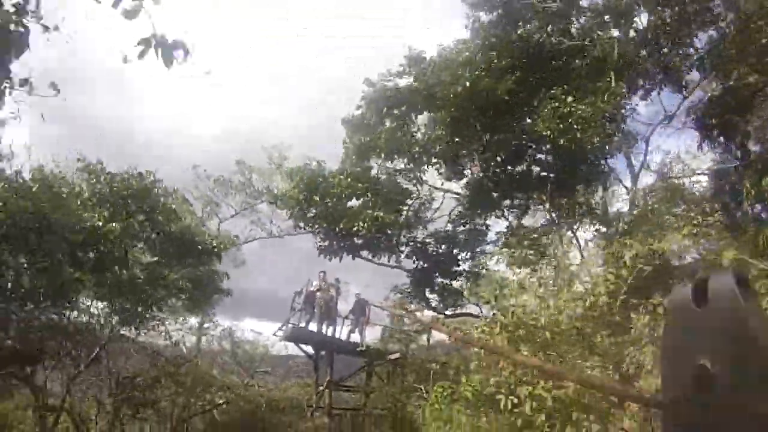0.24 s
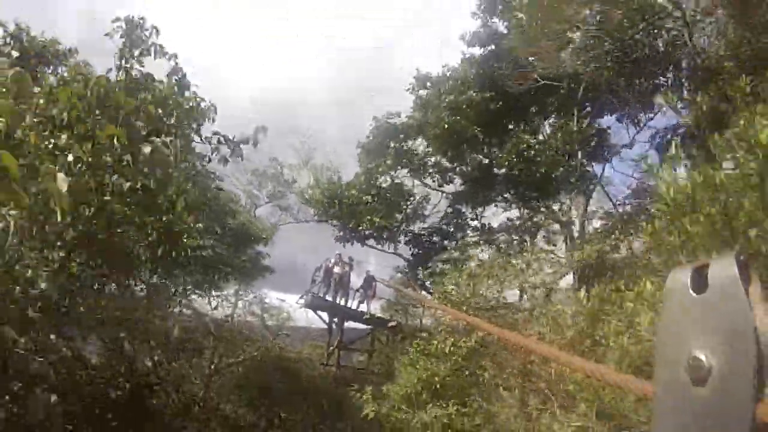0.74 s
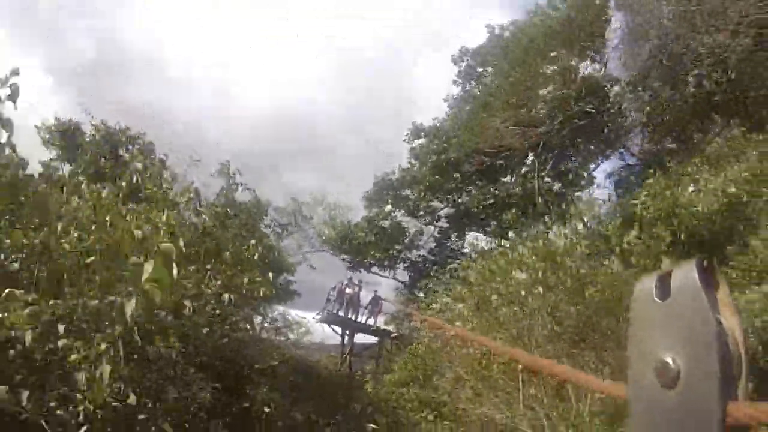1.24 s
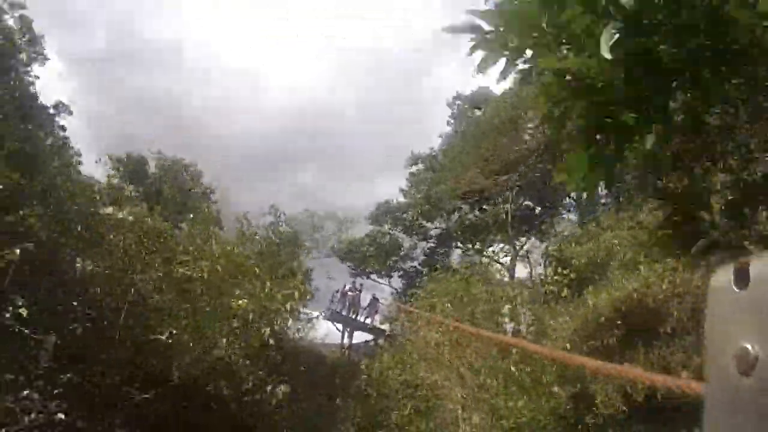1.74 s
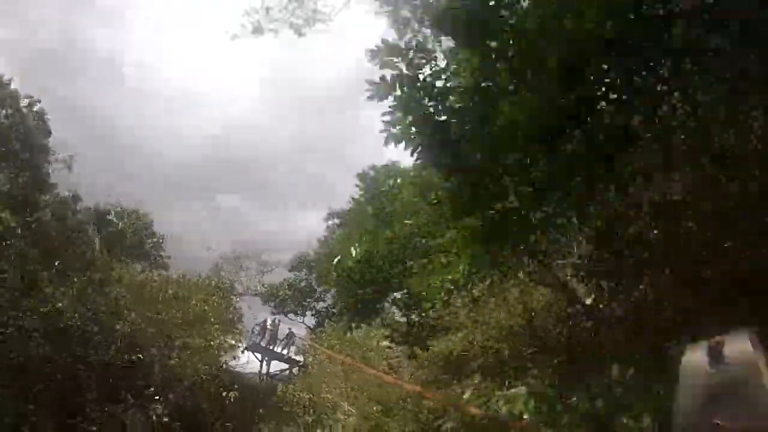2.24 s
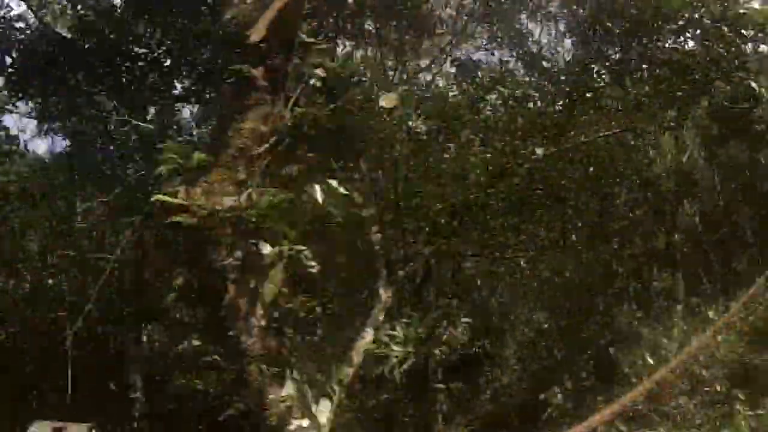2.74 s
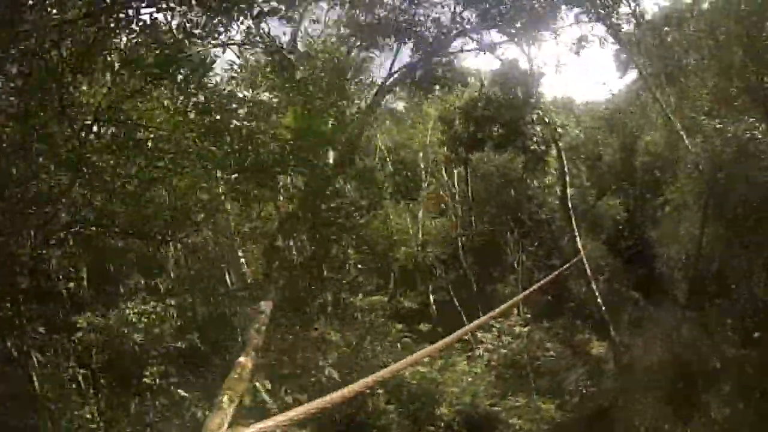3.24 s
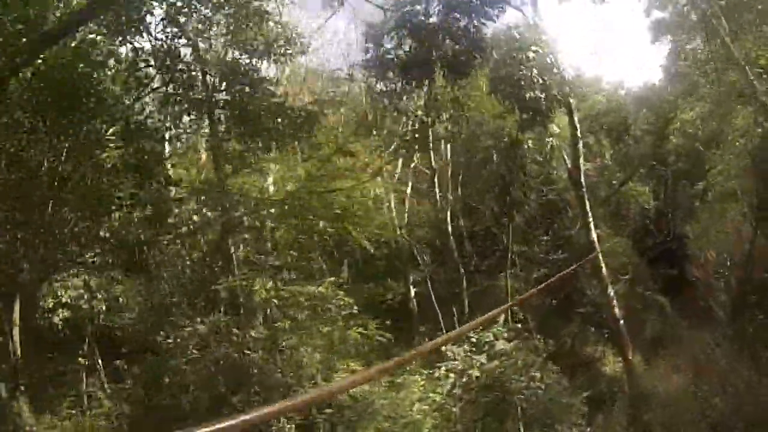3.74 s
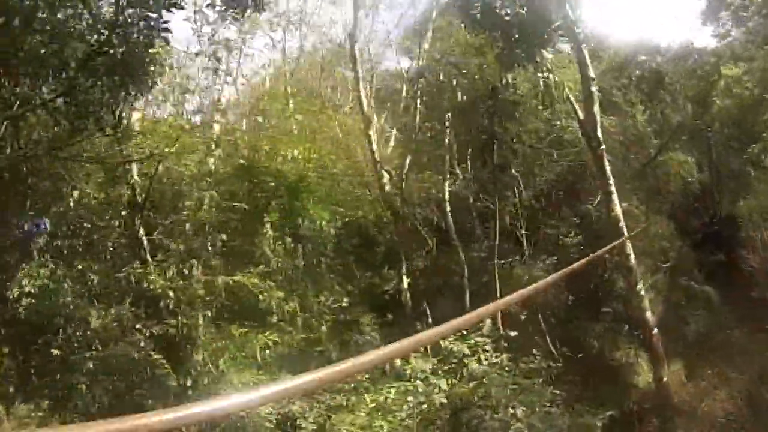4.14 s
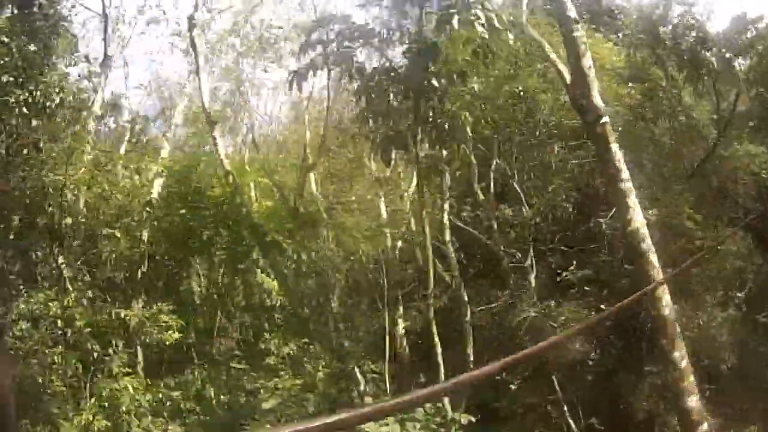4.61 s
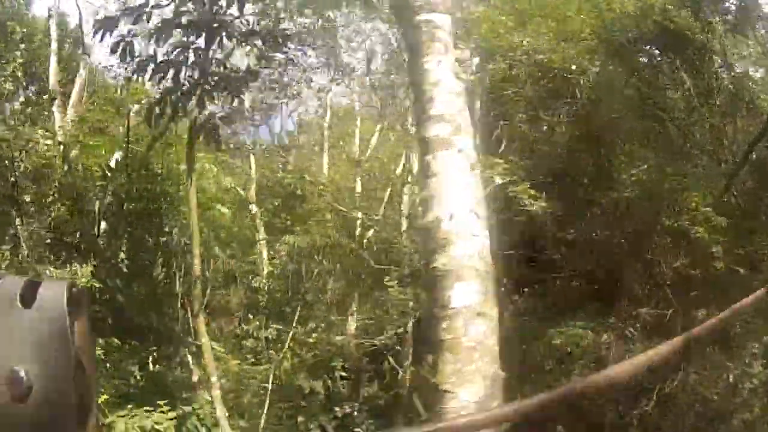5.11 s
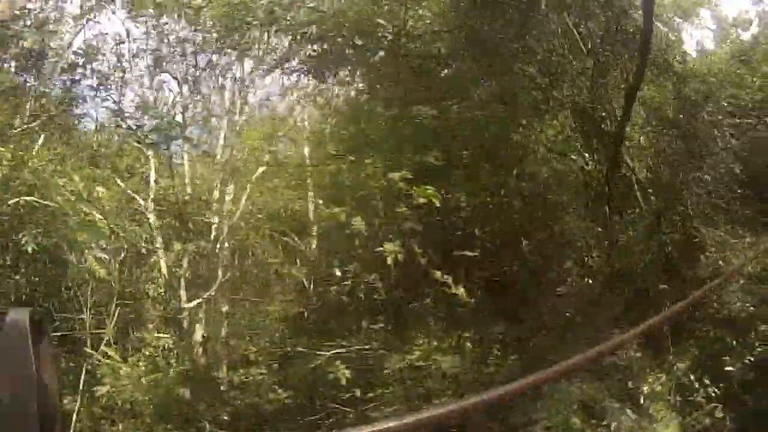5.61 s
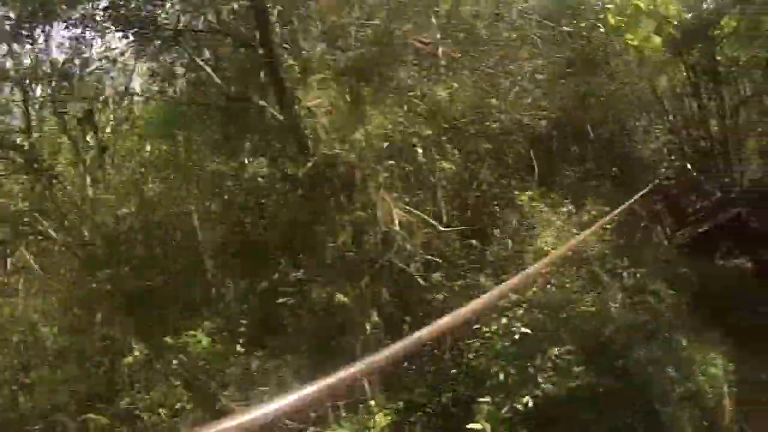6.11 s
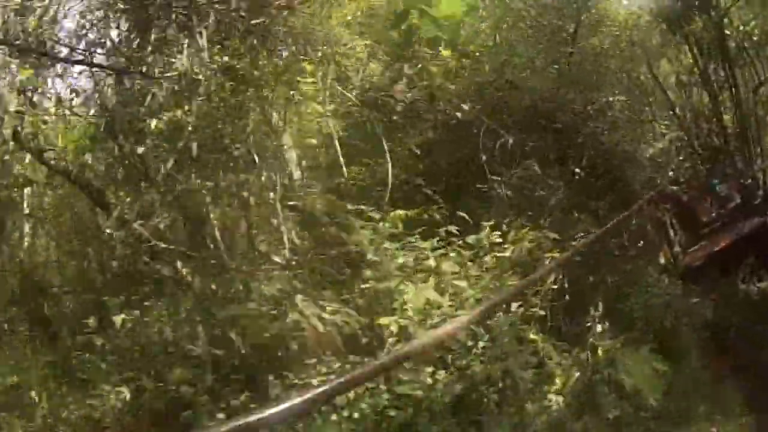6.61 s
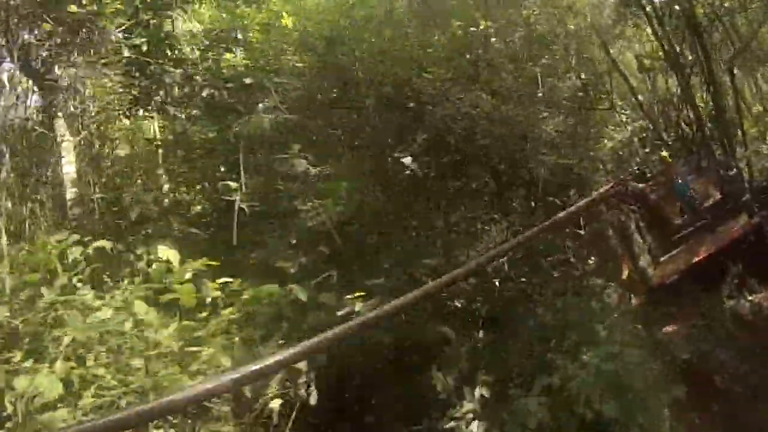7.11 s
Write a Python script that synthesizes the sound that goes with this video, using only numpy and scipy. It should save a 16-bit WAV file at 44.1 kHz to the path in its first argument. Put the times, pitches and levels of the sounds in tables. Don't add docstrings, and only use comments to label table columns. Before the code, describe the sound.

Fast zip line ride heard from a camera housing: harsh buzzing wheel whine, rattling plates, thudding jolts and wind, easing and dropping in pitch at the end.

```python
import sys
import numpy as np
from scipy import signal
from scipy.fft import rfft, irfft
from scipy.io import wavfile
from scipy.ndimage import uniform_filter1d

SR = 44100
rng = np.random.default_rng(int(sys.argv[2]) if len(sys.argv) > 2 else 0)


def gain_from_db(level_db):
    decades = np.asarray(level_db, float) / 20
    return 10 ** decades


def master(y):
    cut = np.clip(np.atleast_2d(y).T, -1, 1)
    pcm = np.round(cut * 32767)
    wavfile.write(sys.argv[1], SR, pcm.astype(np.int16))


N = 324576

# t/s, peak level/dB
WASHER_TAPS = [(5.9495, -49), (6.01, -37), (6.0394, -33), (6.1696, -43), (6.184, -28), (6.2443, -28),
               (6.2749, -35), (6.3966, -32), (6.4285, -24), (6.46, -20), (6.478, -41), (6.493, -21),
               (6.5114, -33), (6.524, -33), (6.5712, -52), (6.7126, -34), (6.7508, -37), (6.8276, -44),
               (6.861, -39), (6.886, -30), (6.9453, -39), (7.0534, -35), (7.2372, -44), (7.326, -45)]


def evened(x):
    return x / np.sqrt(np.mean(x ** 2) + 1e-20)


def columns(rows):
    s, *values = np.transpose(rows)
    return [np.interp(np.arange(N) / SR, s, v) for v in values]


def coloured(points):
    f_hz, level_db = np.transpose(points)
    hz = np.fft.rfftfreq(N, 1 / SR)
    gain_db = np.interp(np.log(hz + 1), np.log(f_hz + 1), level_db, left=-90, right=-90)
    return evened(irfft(rfft(rng.standard_normal(N)) * gain_from_db(gain_db), N))


def wander(top_hz):
    return evened(signal.lfilter(*signal.butter(2, top_hz, fs=SR), rng.standard_normal(N)))


def swells(rows, width_s):
    t = np.arange(N) / SR
    return sum(gain_from_db(db) * np.exp(-.5 * ((t - s) / width_s) ** 2) for s, db in rows)


def spell(middle_s, length_s):
    return np.exp(-(2 * (np.arange(N) / SR - middle_s) / length_s) ** 2)


def passed(x, edge_hz, kind):
    return signal.sosfilt(signal.butter(2, edge_hz, kind, fs=SR, output="sos"), x)


def passed_in_phase(x, order, edge_hz, kind="low"):
    return signal.sosfiltfilt(signal.butter(order, edge_hz, kind, fs=SR, output="sos"), x)


def wind():
    # t/s, level/dB
    wind_curve = [(0, -59.5), (.9, -59.5), (1.44, -54), (2.1, -54), (3.0, -57.5), (4.7, -61), (5.2, -58),
                  (6.1, -59.5), (7.36, -60.5)]
    # f/Hz, level/dB per Hz
    wash_spectrum = [(47, -15), (80, 4), (107, -4.5), (129, -7), (237, -10.5), (356, -14), (436, -22),
                     (600, -38), (780, -28), (1320, -120)]
    # f/Hz, level/dB per Hz
    hum_spectrum = [(310, -27), (345, -4.5), (370, -1), (392, -6.5), (430, -49)]
    # t/s, peak level/dB
    boom_events = [(.7, -59), (1.15, -58), (1.6, -69), (2.06, -56), (2.6, -52), (3.04, -62), (3.56, -57),
                   (4.05, -65), (5.27, -54.5), (5.7, -51), (7.04, -59)]
    gust_db, hum_db, boom_s = -0.1, -71, 0.11
    wash = gain_from_db(columns(wind_curve)[0] + gust_db * wander(2.9) + 3.5) * coloured(wash_spectrum)
    hum_level = gain_from_db(hum_db) + 0.39 * swells(boom_events, boom_s)
    return wash + hum_level * coloured(hum_spectrum)


def rumble():
    # f/Hz, level/dB per Hz
    ride_spectrum = [(7.1, -34), (12, -5), (27, 0.5), (43, 0), (52, -3), (61, -6.5), (68, -10.5), (76, -34),
                     (110, -23), (140, -36), (240, -120)]
    # f/Hz, level/dB per Hz
    end_spectrum = [(7.1, -36), (12, -8.5), (38, -1.5), (58, -2), (72, -14), (79, -31), (81, -34),
                    (86, -39), (110, -41), (140, -71), (240, -120)]
    # t/s, level/dB
    sway_curve = [(0, -41.5), (1.1, -39.5), (2.2, -41.5), (3.0, -32.5), (4.1, -38), (5.0, -35.5),
                  (6.0, -35.5), (7.36, -36.5)]
    # t/s, peak level/dB
    jolt_events = [(.1, -24.5), (.32, -27), (.42, -30), (.65, -19), (.8, -34), (.98, -30), (1.64, -26),
                   (1.86, -37), (2.03, -41), (2.36, -25), (2.62, -14.5), (2.83, -34), (3.0, -22),
                   (3.27, -26), (3.5, -27), (3.79, -21), (3.87, -35), (4.1, -25), (4.43, -18), (4.57, -24),
                   (4.69, -27), (4.88, -50), (5.23, -39), (5.45, -34), (5.74, -28), (6.36, -28),
                   (6.56, -19), (6.92, -23), (7.02, -21), (7.22, -29)]
    jolt_s = 0.019
    slowing = np.interp(np.arange(N) / SR, [5.6, 6.2], [0, np.pi / 2])
    noise = np.cos(slowing) * coloured(ride_spectrum) + np.sin(slowing) * coloured(end_spectrum)
    envelope = uniform_filter1d(abs(signal.hilbert(noise)), 900)
    lumps = passed_in_phase(evened(noise / (7.0 + envelope)), 6, 64)
    shake = gain_from_db(columns(sway_curve)[0]) + 0.24 * swells(jolt_events, jolt_s)
    return shake * lumps


def chatter():
    # middle t/s, length/s, typical peak level/dB
    chatter_spells = [
        (.45, .5, -42),
        (1.1, 0.82, -35.5),
        (1.7, 0.56, -42),
        (2.25, 0.55, -39),
        (6.3, .5, -44),
        (6.8, 0.52, -47),
    ]
    taps_per_s, decay_s, rise_s = 99, 0.0012, 0.00047
    t = np.arange(300) / SR
    strength = sum(gain_from_db(db) * spell(s, length_s) for s, length_s, db in chatter_spells)
    size = gain_from_db(3.6 * np.minimum(rng.exponential(1, N), 3)) * (rng.random(N) < taps_per_s / SR)
    spot = rng.integers(0, 3, N)
    taps = 0
    for k, hz in enumerate((3650, 4100, 4500)):
        tap = np.sin(2 * np.pi * hz * t) * np.exp(-t / decay_s) * np.minimum(t / rise_s, 1)
        taps = taps + signal.oaconvolve(size * (spot == k), tap)[:N]
    return strength * taps


def ticks():
    ring_s, click_s, rise_s = 0.0044, 0.0012, 0.0014
    out, t = np.zeros(N + SR), np.arange(900) / SR
    for (s, db), (detune, phase) in zip(WASHER_TAPS, rng.random((len(WASHER_TAPS), 2))):
        ring_hz = 4050 * (.985 + 0.028 * detune)
        ring = np.sin(2 * np.pi * ring_hz * t) * np.exp(-t / ring_s)
        click = 0.43 * np.sin(2 * np.pi * (5100 * t + phase)) * np.exp(-t / click_s)
        out[round(s * SR):][:900] += gain_from_db(min(db, -30) - 3) * (ring + click) * np.minimum(t / rise_s, 1)
    return out[:N]


def knocks(rows, low_hz, high_hz):
    force, t = np.zeros(N + SR), np.arange(800) / SR
    fade = np.exp(-t / 0.0048)
    fade_rms = np.sqrt(np.mean(fade ** 2))
    for (s, db), noise in zip(rows, rng.standard_normal((len(rows), 800))):
        force[round(s * SR):][:800] += gain_from_db(min(db, -25) - 1) * evened(noise * fade) * fade_rms
    steep = passed(passed(force[:N], low_hz, "high"), low_hz, "high")
    return passed(steep, high_hz, "low")


def blows():
    # t/s, peak level/dB
    early_knocks = [(0.1096, -33), (0.188, -31), (0.2154, -35), (0.2628, -36), (0.3411, -21), (0.3905, -33),
                    (0.4339, -38), (0.4813, -24), (0.5472, -29), (0.5861, -21), (0.7093, -39),
                    (0.7367, -32), (0.7507, -25), (0.8445, -36), (0.8619, -33), (0.9293, -32),
                    (0.9552, -35), (0.9707, -29), (0.9877, -28), (1.1164, -21), (1.1787, -32),
                    (1.2087, -23), (1.256, -36), (1.2725, -30), (1.3284, -25), (1.3857, -35), (1.4062, -32),
                    (1.4691, -31), (1.4885, -29), (1.5833, -34), (1.6382, -21), (1.6646, -32),
                    (1.6776, -23), (1.7065, -27), (1.732, -25), (1.7749, -31), (1.7933, -37), (1.8437, -32),
                    (1.8946, -29), (1.9126, -25), (1.9819, -24), (2.0348, -33), (2.0697, -20),
                    (2.1206, -23), (2.1595, -26), (2.1784, -34), (2.2273, -37), (2.3605, -28),
                    (2.4254, -26), (2.4648, -31), (2.5002, -31), (2.5202, -37)]
    # t/s, peak level/dB
    late_knocks = [(2.5848, -21), (2.7449, -31), (2.8851, -29), (2.912, -28), (2.9759, -25), (3.0771, -27),
                   (3.131, -26), (3.1445, -23), (3.2098, -39), (3.2632, -33), (3.2877, -27), (3.3779, -25),
                   (3.4288, -28), (3.5221, -27), (3.5341, -22), (3.6124, -32), (3.7062, -25), (3.8559, -30),
                   (3.8688, -32), (3.8923, -35), (3.9092, -30), (3.9781, -27), (4.0519, -35), (4.0694, -29),
                   (4.0873, -31), (4.1163, -26), (4.1587, -30), (4.1716, -31), (4.2245, -31), (4.257, -32),
                   (4.3028, -33), (4.3802, -39), (4.434, -34), (4.4605, -24), (4.4979, -21), (4.5164, -24),
                   (4.6082, -26), (4.6311, -34), (4.685, -28), (4.7134, -27), (4.7374, -23), (4.7538, -20),
                   (4.8052, -40), (4.8182, -27), (4.884, -25), (4.9259, -21), (5.0477, -22.5),
                   (5.0881, -28), (5.116, -37), (5.2597, -24), (5.325, -23), (5.3654, -24), (5.4373, -38),
                   (5.5181, -30), (5.5316, -25), (5.545, -24), (5.561, -20), (5.8009, -27)]
    return knocks(early_knocks + late_knocks, 3030, 8500) + gain_from_db(-7) * knocks(WASHER_TAPS, 2400, 8000)


def rattle(per_s, depth):
    decay_s = 0.0077
    jumps = gain_from_db(4 * np.minimum(rng.exponential(1, N), 2)) * (rng.random(N) < per_s / SR)
    jumps = signal.lfilter([1], [1, -np.exp(-1 / (decay_s * SR))], jumps)
    return (1 + depth * jumps) * gain_from_db(0.2 * wander(30))


def whine(strands, pose):
    push_db = (-24, -29, -22.5, -37.5)
    reach_db = (-1.5, 3.5, 0, 0.5, -13)
    # middle t/s, length/s, multiple of the strand rate, force level/dB
    singing_spells = [(.3, 2, 2, -26.5), (2.852, 0.5, 2, -31), (4.197, .35, 4, -22), (1.5, 0.56, 2, -23.5),
                      (2.45, 0.3, 3, -27), (2.75, 1.4, 3, -33), (3.164, 0.56, 3, -22),
                      (3.698, 0.56, 3, -30), (4.237, 0.36, 3, -26), (5.66, 0.56, 3, -37),
                      (3.2, 0.51, 4, -22), (5.9, 0.78, 4, -25), (.4, 1.5, 3, -35), (5.0, .6, 3, -37),
                      (7.095, 0.9, 2, -22), (7.136, 0.43, 4, -22)]
    reach = gain_from_db(np.interp(pose, range(5), reach_db))
    strength = [gain_from_db(db) * reach for db in push_db]
    for s, length_s, multiple, db in singing_spells:
        k = round(multiple) - 1
        strength[k] = strength[k] + gain_from_db(db) * spell(s, length_s)
    force = 0
    for k, a in enumerate(strength, 1):
        force = force + a * gain_from_db(2.3 * wander(22)) * np.sqrt(2) * np.sin(2 * np.pi * k * strands)
    return force


def wheels(strands):
    strands_per_turn = 4.35
    turns = strands / strands_per_turn + .15 * wander(8)
    alternate = (turns // 1 % 2 - .5) * 2
    uneven = 1 + 0.3 * np.clip(1 + wander(2.8), 0, 2) * alternate
    flat_spot = np.exp(-(turns % 1) / 0.17)
    throb = 1 + 1.74 * uneven * np.clip(1 + 0.1 * wander(1.6), 0, 3) * flat_spot
    throb = throb * (1 + 0.054 * np.cos(2 * np.pi * strands))
    rough = throb * rattle(130, 0.29)
    noise = rng.standard_normal(N)
    roll = passed_in_phase(noise, 1, 2900)
    hiss = passed_in_phase(noise, 2, 7000, "high")
    middle = noise - roll - hiss
    hiss_gain = evened(rough ** .3 * rattle(160, .2))
    return roll * evened(rough ** .2) + middle * evened(rough) + hiss * hiss_gain


def frame_ring(pose):
    # f/Hz, width/Hz, level/dB in pose 0, 1, 2, 3, 4
    lower_modes = [(388, 550, -30, -28, -29.5, -34.5, -29), (904, 337, -17.5, -16, -16.5, -18.5, -22.5),
                   (984, 135, -40.3, -10, -7, -15.5, -12.5), (1153, 200, -11.5, -5.5, -8.5, -10, -12),
                   (1422, 228, -10, -3.5, -10, -12.5, -13.5), (1650, 700, -60.0, -12, -7.5, -9, -17),
                   (2035, 207, -10.5, -57, -71, -17, -23), (2487, 416, -10, -9, -8.5, -8, -19.5),
                   (3025, 660, -24, -10, -11.5, -8, -17.5), (3560, 240, -13, -47, -19, -20, -25), ]
    # f/Hz, width/Hz, level/dB in pose 0, 1, 2, 3, 4
    higher_modes = [(4350, 210, -15.5, -39, -18, -23, -24), (5260, 320, -23, -19, -17, -14.5, -24.5),
                    (6230, 1250, -26, -25.5, -30, -33, -31), (6666, 320, -21, -28, -25, -41, -34),
                    (7780, 540, -24, -29, -26.5, -27.5, -29), (8560, 580, -32.5, -32, -30, -33.5, -35.5),
                    (9370, 940, -34.5, -28.5, -32, -35, -46), (10390, 950, -52, -41, -41, -32, -40.5),
                    (11932, 7200, -44.5, -51, -49, -47, -55), (13927, 1130, -51, -50.2, -56, -48, -55)]
    # f/Hz, width/Hz, level/dB in pose 0, 1, 2, 3, 4
    ringing_modes = [(2334, 60.4, 1.1, 0.0, -2, 0.7, -7.5), (3008, 50.6, -0.8, -1.5, -0.7, -2.5, -15),
                     (4040, 220, -15.5, -11, -12, -14, -17.5), (4735, 55, -11.5, -16, -14, -17, -12),
                     (4990, 100, -16.5, -14, -12.5, -13.5, -19), (6466, 44, -17.5, -26, -15.5, -15, -22.5),
                     (7500, 140, -28.5, -19.4, -19, -20.5, -22), (9340, 140, -28, -26, -28, -24, -53),
                     (11350, 225, -44.8, -35, -40, -40, -46.1), (12290, 110, -47, -37, -37, -31.5, -47)]
    # f/Hz, width/Hz, level/dB
    path_dips = [
        [(1215, 48, -4.5), (2910, 73, -11), (3140, 82, 1), (9310, 210, -13), (13750, 380, -7)],
        [(12750, 200, -4)],
        [(2100, 140, -6.5), (12950, 400, -5)],
        [(2185, 100, -10), (2710, 224, -10), (13550, 500, -6)],
        [(1090, 53, -14), (3430, 72, -13), (4670, 94, -14), (7270, 350, -8)],
    ]
    hz = abs(np.fft.fftfreq(8192, 1 / SR))
    power = 0
    for centre, width, *db in lower_modes + higher_modes:
        power = power + gain_from_db(2 * db[pose]) / (1 + (2 * (hz - centre) / width) ** 2) ** 2
    for centre, width, *db in ringing_modes:
        off = 2 * (hz - centre) / width
        power = power + gain_from_db(2 * db[pose]) / (1 + off ** 2) / (1 + (off / 6) ** 2)
    for centre, width, db in path_dips[pose]:
        power = power * gain_from_db(2 * db / (1 + (2 * (hz - centre) / width) ** 2))
    power = power / np.mean(power * (hz > 2000) * (hz < 6000))
    log_gain = .5 * np.log(power + 1e-9)
    return np.fft.ifft(np.exp(log_gain - 1j * signal.hilbert(log_gain).imag)).real[:4096]


def glints(force):
    # middle t/s, length/s, f/Hz, level/dB
    glint_spells = [(0.081, .25, 3008, 9), (0.45, .9, 9500, -43), (1, .8, 12300, -46), (.6, .3, 11400, -51),
                    (2.2, .6, 11400, -52), (1.6, .6, 7750, -43), (2.45, .15, 12000, -44),
                    (2.7, .3, 11000, -40), (2.84, .2, 9400, -40), (2, .3, 3200, -14), (5.5, .7, 1205, -9),
                    (3.4, .2, 2100, -4), (3.2, .3, 1500, -10), (5.6, .9, 990, -14), (7.15, .3, 1010, -18),
                    (3.3, 0.45, 9350, -36), (4.3, .4, 9350, -30), (5.5, .4, 9350, -36),
                    (5.0, 1.2, 12300, -40), (3.05, 0.23, 4700, -29), (2.5, .12, 6100, -18),
                    (6.48, .15, 6470, -23), (4.55, .1, 3008, 13), (6.9, .1, 3008, 7), (5.6, .15, 7550, -28),
                    (2.75, .25, 13500, -42)]
    sharpness = 90
    out = 0
    for s, length_s, hz, db in glint_spells:
        ring = signal.lfilter(*signal.iirpeak(hz, sharpness, fs=SR), force)
        out = out + gain_from_db(db) * spell(s, length_s) * ring
    return out


def trolley():
    # t/s, strands passing a wheel per second/Hz
    speed_curve = [(0, 268), (1, 294), (2, 313), (2.6, 321), (3.25, 328), (3.55, 321), (3.9, 327),
                   (4.4, 326), (5, 314), (5.5, 311), (5.9, 298), (6.8, 270), (7.1, 257), (7.36, 248)]
    # t/s, level/dB
    load_curve = [(0, -42.5), (.35, -37), (1.0, -36.5), (1.5, -37), (1.8, -37.5), (2.4, -36.5),
                  (3.04, -37.5), (4.0, -37.5), (4.7, -36.5), (5.4, -38), (5.9, -40), (6.2, -45),
                  (6.4, -44.5), (7.0, -43.5), (7.2, -45.5), (7.36, -45)]
    # t/s, peak added load level/dB
    bounce_events = [(.06, -45), (.6, -45), (.96, -55), (1.44, -47.5), (2.1, -70), (2.42, -54), (2.75, -51),
                     (3.2, -55), (3.68, -48), (4.16, -46.5), (4.5, -49.5), (4.92, -59), (5.56, -53),
                     (6.2, -49), (6.88, -67)]
    # t/s, pose (0 back, 1 swinging round, 2 side on, 3 ahead, 4 ahead and lowered)
    pose_curve = [(0, 0.0), (2.3, 0.04), (2.52, .25), (2.7, .95), (2.9, 1.05), (3.05, 1.98), (4.2, 2.02),
                  (4.6, 2.98), (5.8, 3.02), (6.04, 3.98), (7.36, 4.0)]
    # t/s, gain level/dB
    screen_curve = [(0, 2.5), (.5, 2), (1.5, 0), (1.85, 5.5), (2.5, 5), (3.0, 0.5), (3.25, -1.5), (6.1, 1),
                    (7.36, 2)]
    pose_bass_db, pose_treble_db = (-1.5, -1.6, -0.7, 2.13, -0.8), (-3.6, 2.5, 1.2, 0.5, 0.5)
    bass_lag, treble_lag = 0.85, 0.89
    treble_screened, bounce_s = 0.41, 0.072

    strands = np.cumsum(columns(speed_curve)[0] * (1 + .010 * wander(30))) / SR
    level_db = 20 * np.log10(gain_from_db(columns(load_curve)[0]) + swells(bounce_events, bounce_s))
    settled_db = uniform_filter1d(level_db, SR // 2)
    quick_db = level_db - settled_db
    pose = np.clip(columns(pose_curve)[0], 0, 4)
    screen_db = columns(screen_curve)[0]
    bass_db = np.interp(pose, range(5), pose_bass_db) + screen_db - bass_lag * quick_db
    treble_db = np.interp(pose, range(5), pose_treble_db) + treble_screened * screen_db - treble_lag * quick_db

    struck = blows() / gain_from_db(settled_db)
    force = wheels(strands) + whine(strands, pose) + struck
    bass = passed_in_phase(force, 2, 1900)
    treble = passed_in_phase(force, 2, 8500, "high")
    force = force + bass * (gain_from_db(bass_db) - 1) + treble * (gain_from_db(treble_db) - 1)
    heard = 0
    for k in range(5):
        share = np.maximum(1 - abs(pose - k), 0)
        heard = heard + share * signal.oaconvolve(force, frame_ring(k))[:N]
    return gain_from_db(level_db) * (heard + gain_from_db(5) * glints(force))


def scene():
    return (wind() + rumble() + chatter() + ticks() + trolley())[None]


def faint_top_lost(x):
    hz, _, z = signal.stft(x, SR, nperseg=1024)
    power = uniform_filter1d(abs(z) ** 2, size=3, axis=-2)
    power_db = 10 * np.log10(uniform_filter1d(power, size=2, axis=-1) + 1e-20)
    top = hz > 12500
    judged = top & (hz < 14700)
    power_db = power_db - .7 * uniform_filter1d(power_db[:, judged].mean(1), size=25)[:, None]
    power_db = power_db - 4 * np.maximum(hz - 14700, 0)[:, None] / 700
    limit_db = np.percentile(power_db[:, judged], 20)
    lost = top[:, None] & (power_db < limit_db)
    return signal.istft(z * ~lost, SR, nperseg=1024)[1][:, :N]


def low_pass(x):
    return signal.sosfilt(signal.butter(12, 15380, fs=SR, output="sos"), x)


def record(dry):
    mix = faint_top_lost(dry)
    return low_pass(mix)


dry = scene()
out = record(dry)
master(out)
```